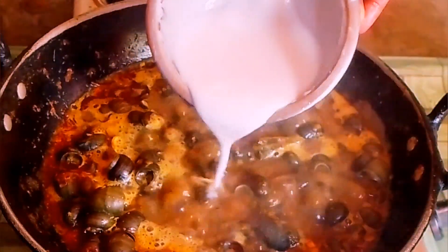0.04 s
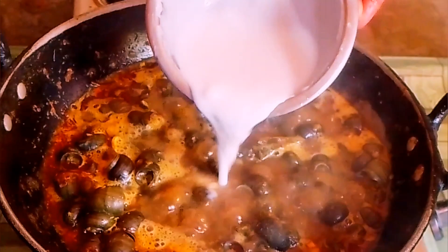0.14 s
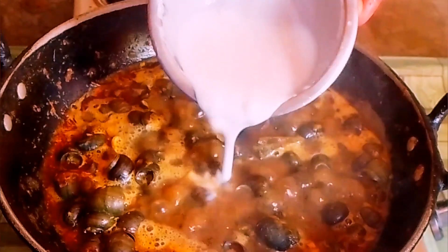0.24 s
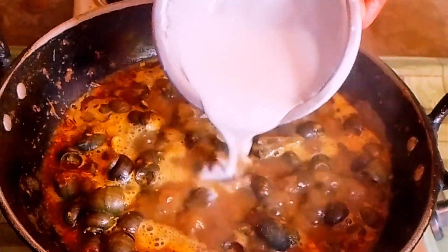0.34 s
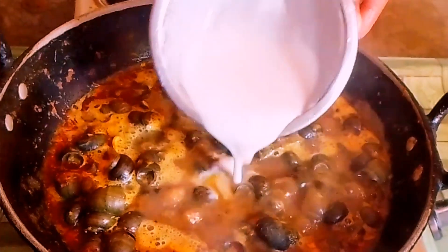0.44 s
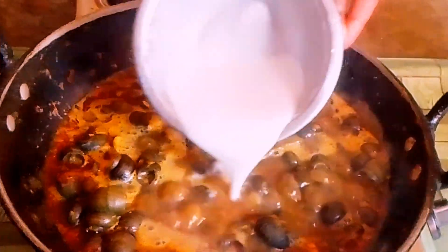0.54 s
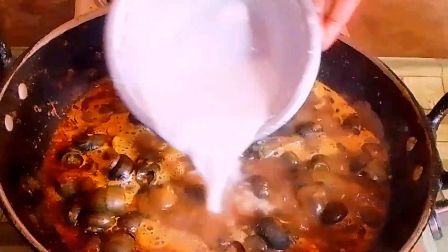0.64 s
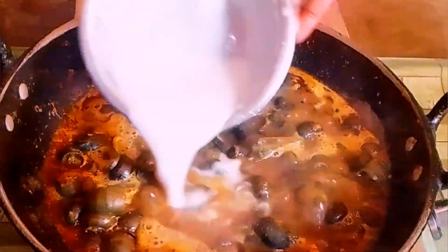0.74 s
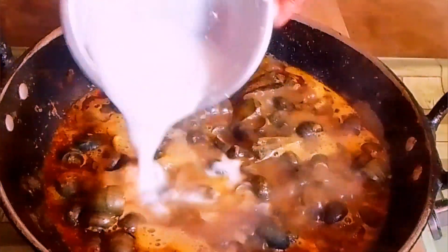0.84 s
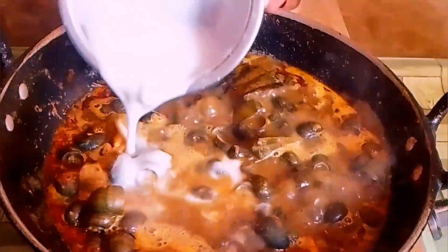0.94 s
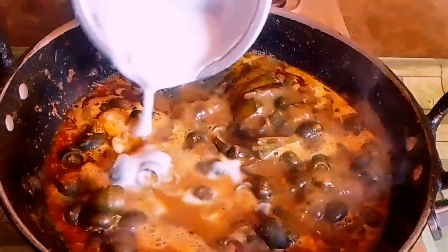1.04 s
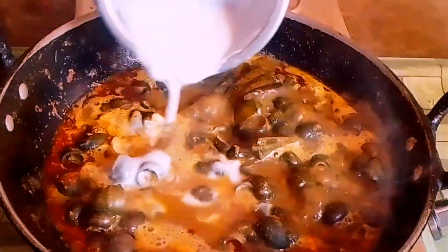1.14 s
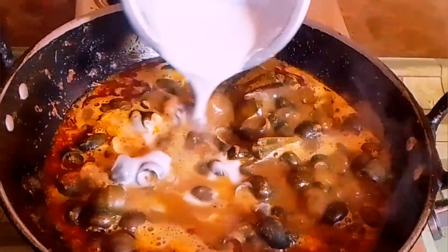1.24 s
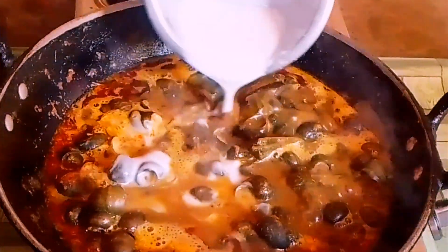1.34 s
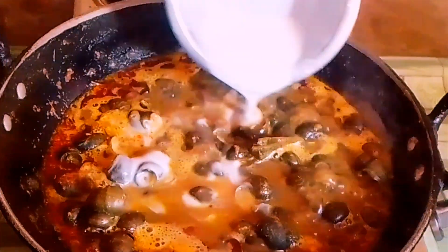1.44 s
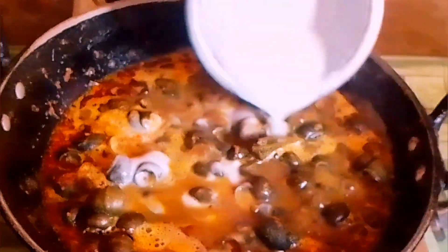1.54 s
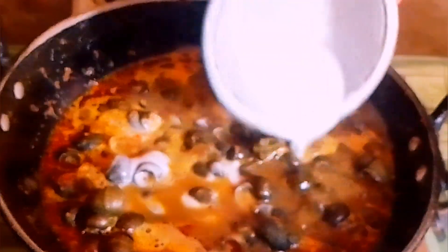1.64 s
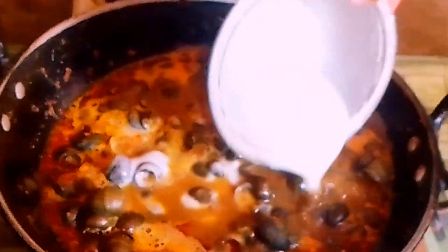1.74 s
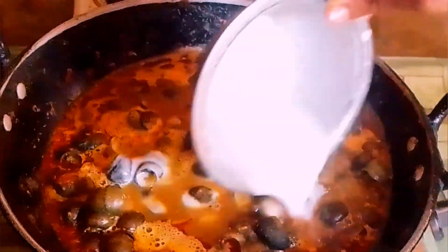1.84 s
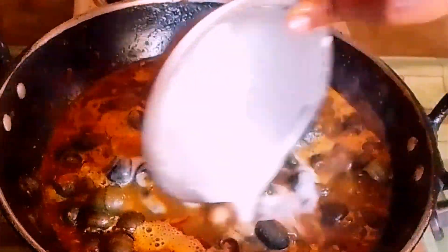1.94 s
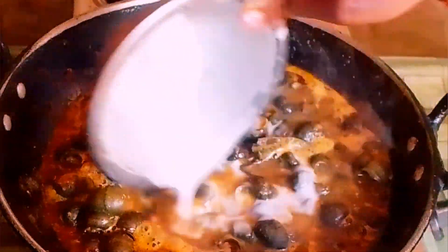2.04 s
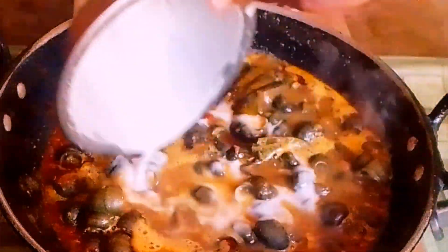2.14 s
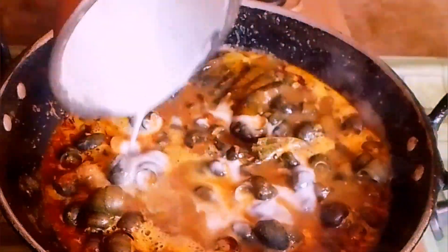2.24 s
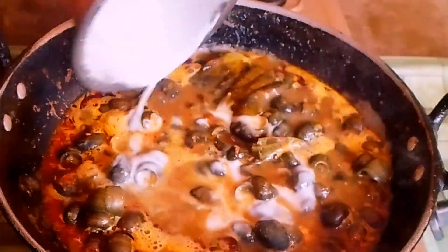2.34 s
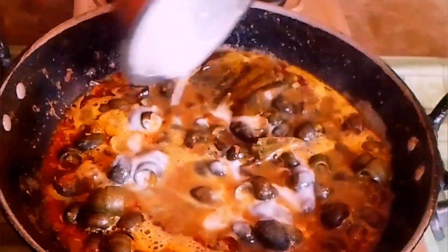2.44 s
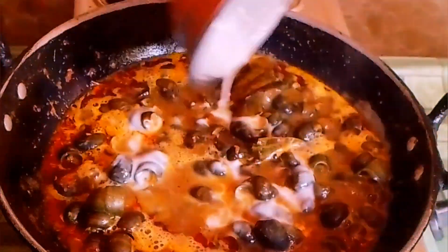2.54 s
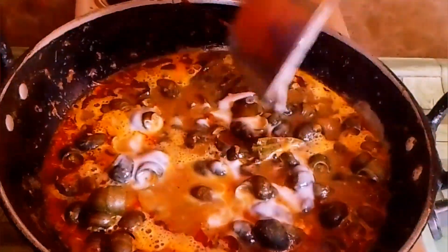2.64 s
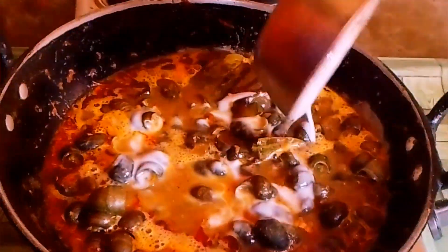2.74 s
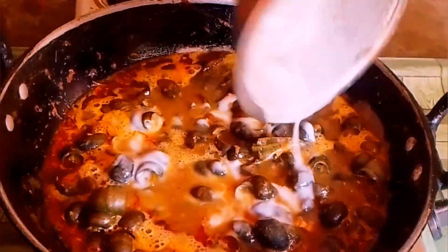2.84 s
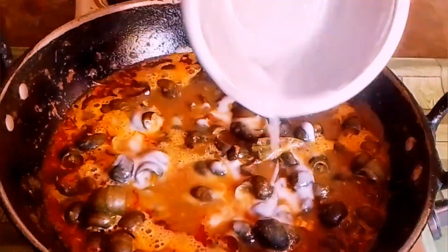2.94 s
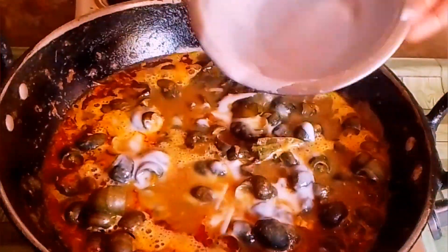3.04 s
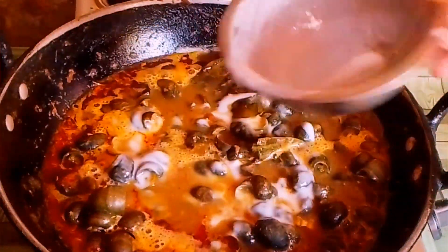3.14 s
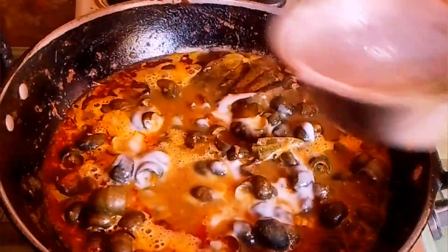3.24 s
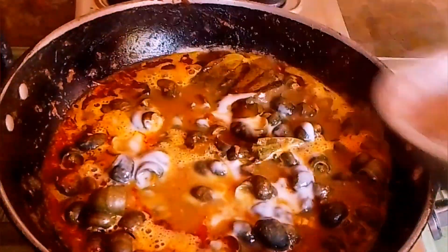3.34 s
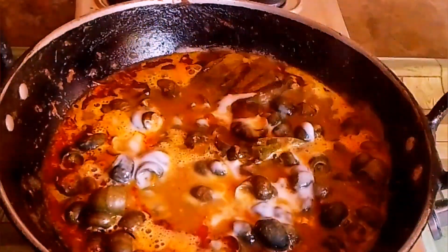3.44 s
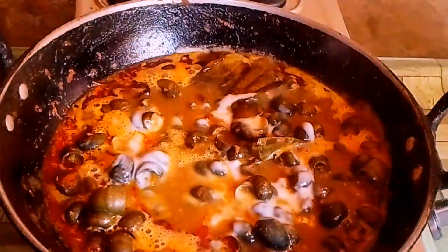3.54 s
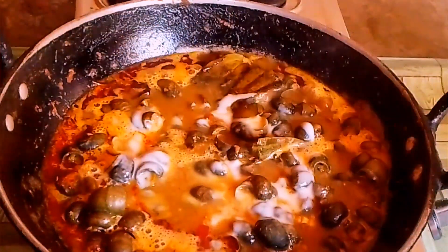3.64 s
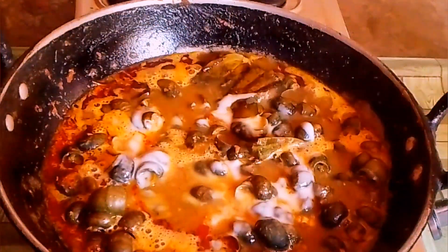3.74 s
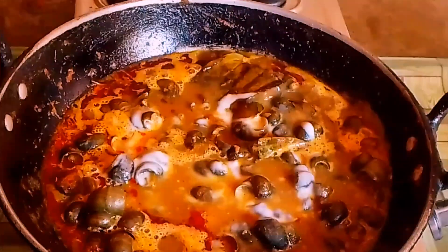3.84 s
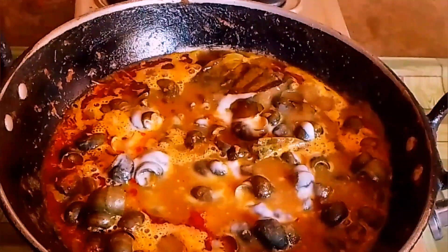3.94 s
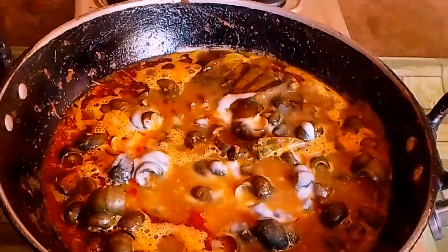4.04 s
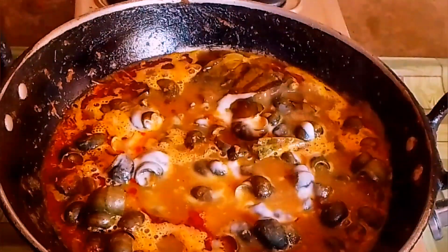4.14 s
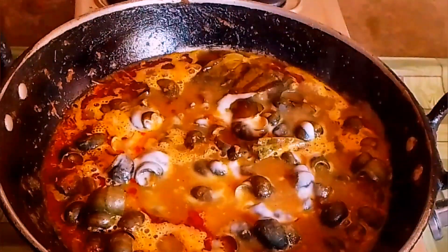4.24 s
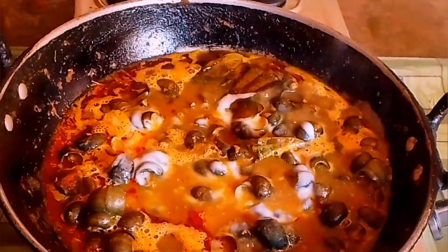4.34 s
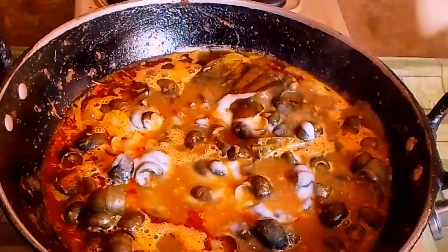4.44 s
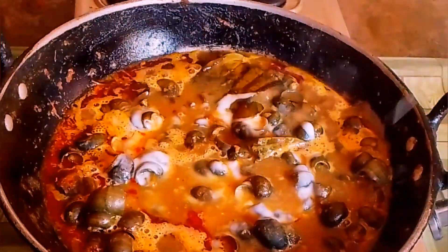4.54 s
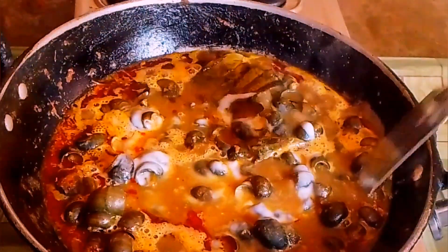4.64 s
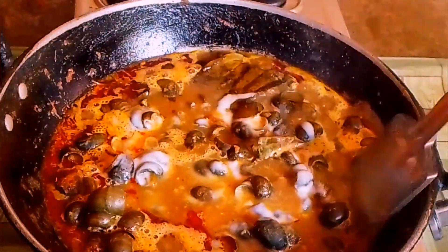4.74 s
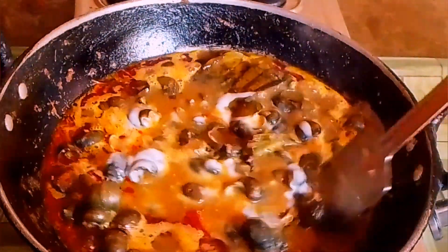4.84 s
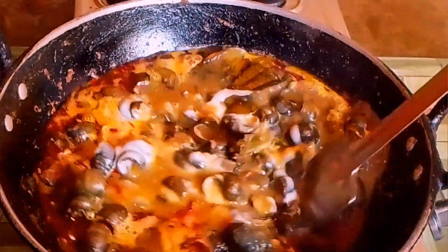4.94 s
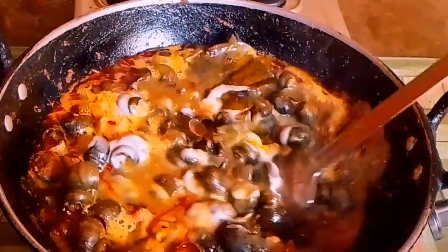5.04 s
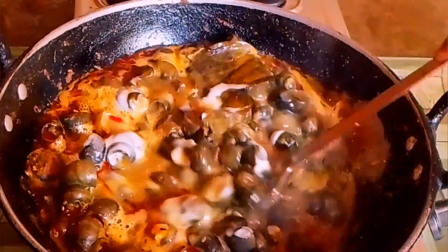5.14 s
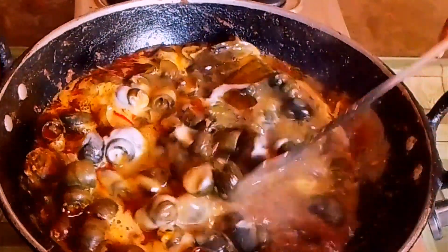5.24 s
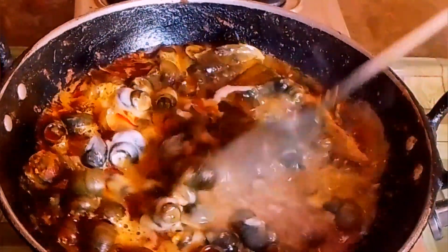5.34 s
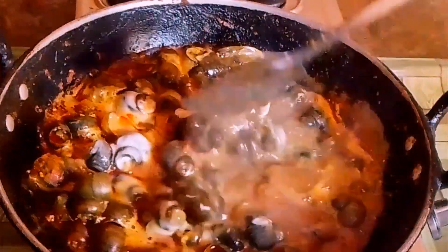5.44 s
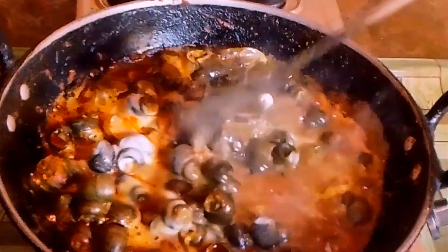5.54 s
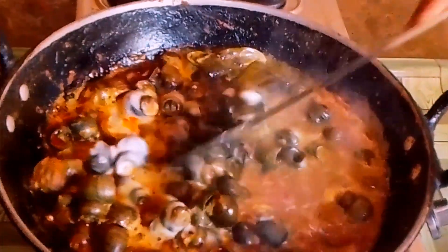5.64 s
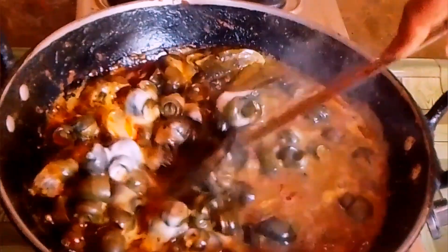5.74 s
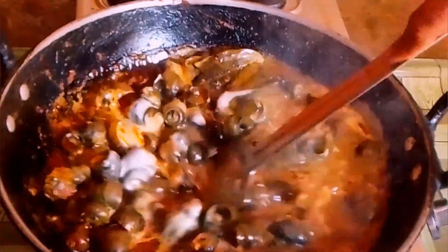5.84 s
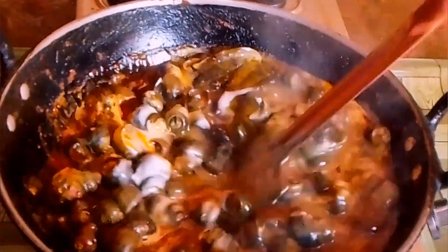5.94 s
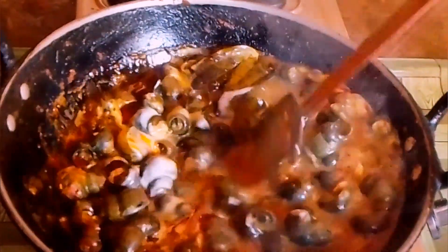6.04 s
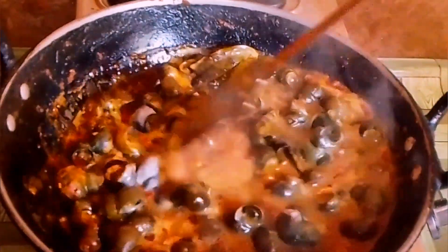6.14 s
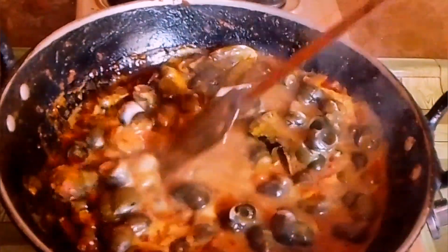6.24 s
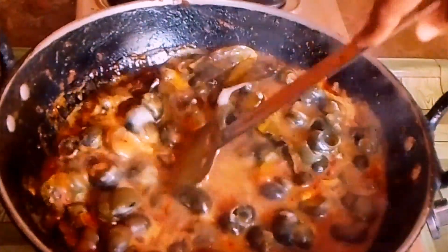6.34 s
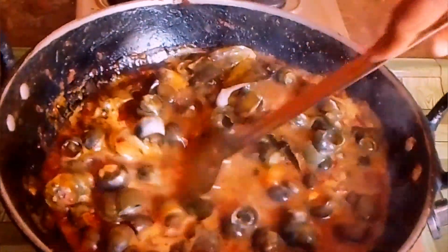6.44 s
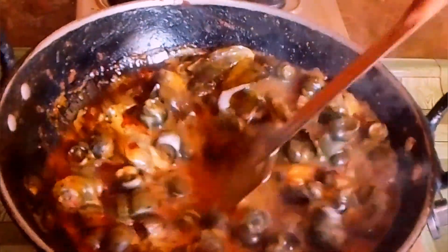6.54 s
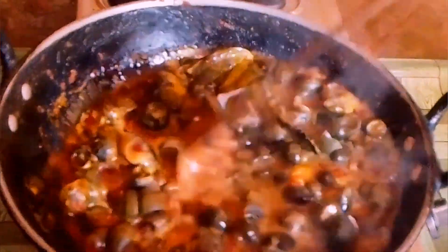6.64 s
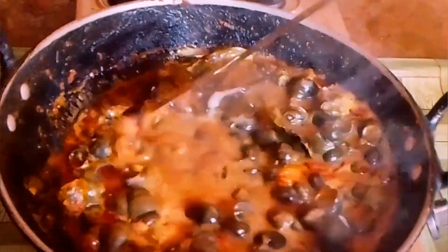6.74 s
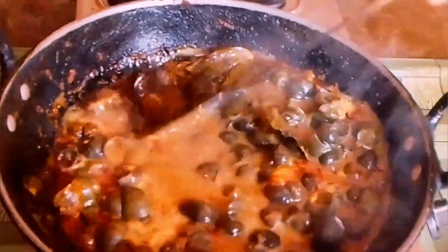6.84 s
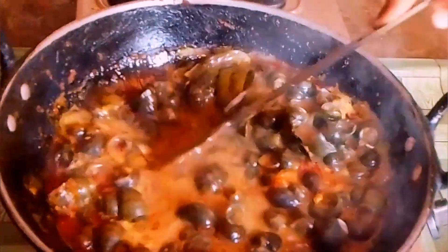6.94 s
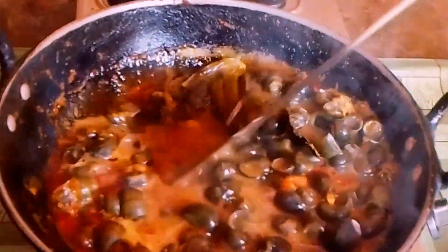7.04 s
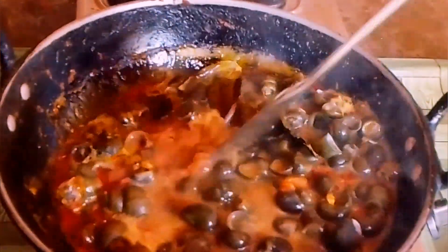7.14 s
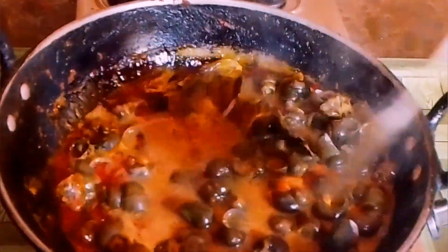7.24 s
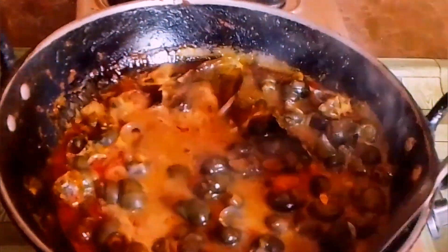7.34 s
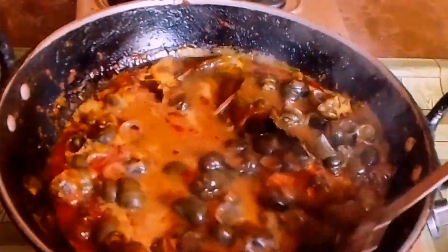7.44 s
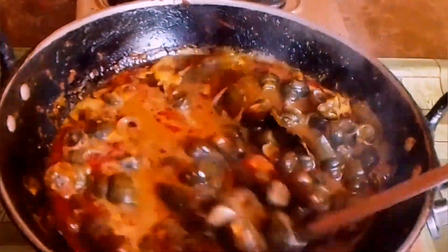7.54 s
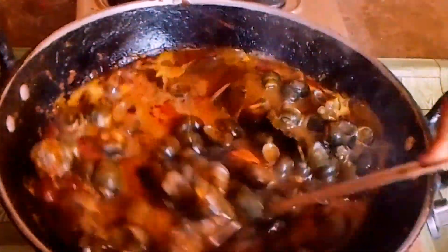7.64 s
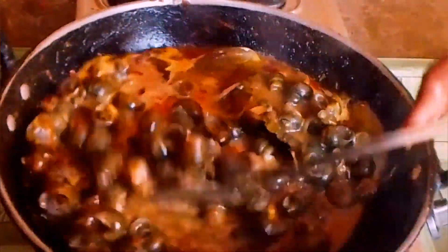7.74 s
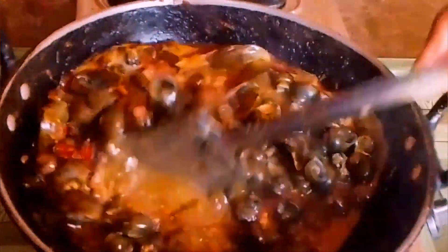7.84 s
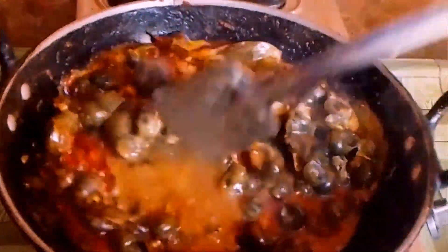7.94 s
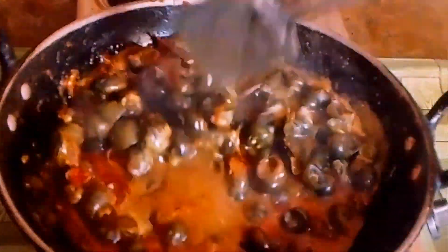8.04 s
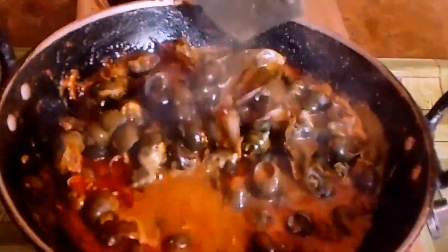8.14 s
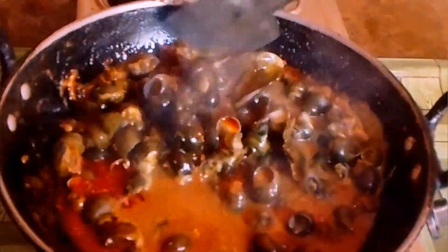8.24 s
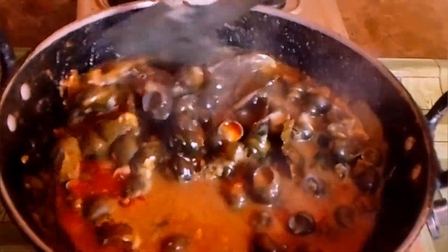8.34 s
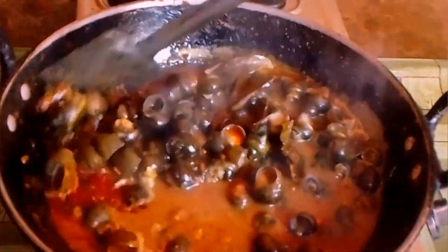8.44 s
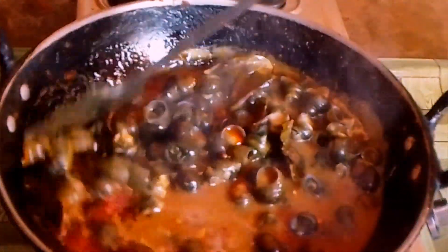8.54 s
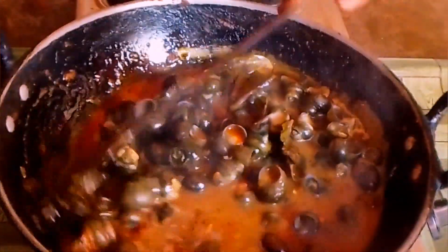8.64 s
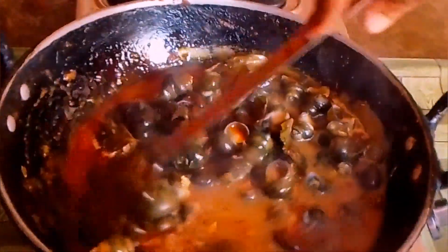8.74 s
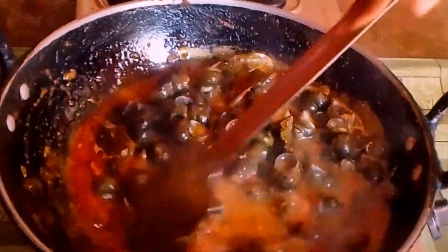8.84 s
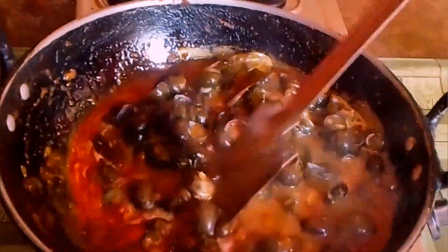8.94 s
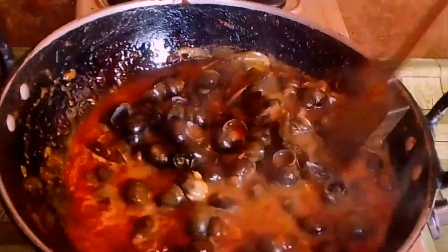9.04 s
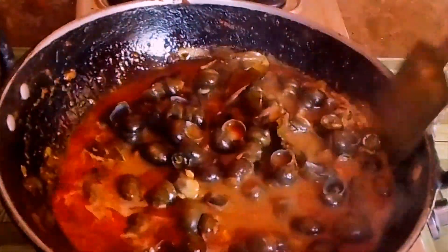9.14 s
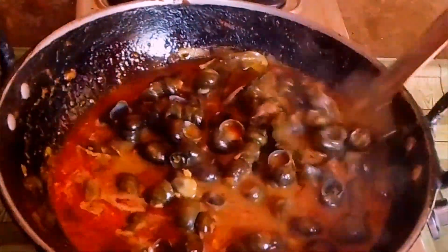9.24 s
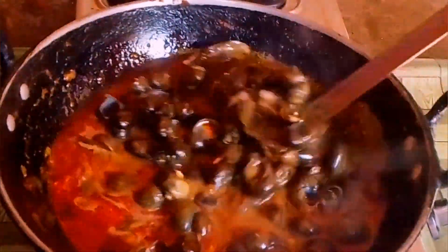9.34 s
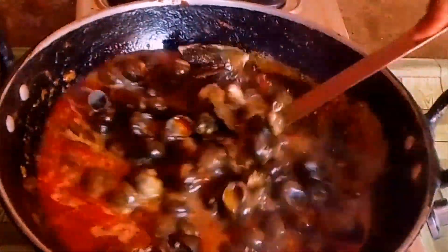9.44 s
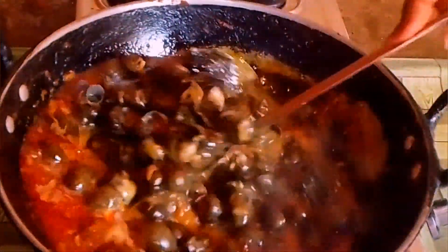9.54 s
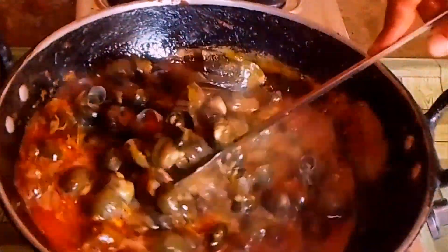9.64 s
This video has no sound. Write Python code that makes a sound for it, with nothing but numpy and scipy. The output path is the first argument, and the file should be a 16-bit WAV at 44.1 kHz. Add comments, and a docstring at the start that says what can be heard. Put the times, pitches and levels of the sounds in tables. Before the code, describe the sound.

Close above a pan in a small kitchen, thick sauce simmers quietly with plopping bubbles, fine fizz and thin steam whistles, then calms. An emptied bowl faintly tinks and rubs along the counter. Suddenly a steel spatula knocks the pan, much louder, and repeated strokes shove snail shells that snap, rattle and scrape in sloshing sauce over a soft burner rush.

```python
"""Snails simmer in a thick curry, heard from just above the pan: decaying rings make bubbles plop and foam fizz,
gliding noise bands make steam sing thinly, and a low hum lies under a steady rush of noise.
Coconut milk calms the boil; then the emptied bowl tinks down and slides aside as resonant friction noise.
Last, a wooden-handled steel spatula knocks into the pan as noise bursts and damped modes, and shoves the shells,
which snap, rattle and scrape through sloshing sauce."""
import sys
import numpy as np
from scipy import signal
from scipy.fft import rfft, irfft, next_fast_len
from scipy.io import wavfile
from scipy.ndimage import map_coordinates

SR = 44100
rng = np.random.default_rng(int(sys.argv[2]) if len(sys.argv) > 2 else 0)


def wav_record(signal):
    """Record a signal, one row per channel, as 16-bit PCM in the file named by sys.argv[1]."""
    frames = np.transpose(np.atleast_2d(signal))
    bounded = np.clip(frames, -1, 1)
    # unit amplitude maps onto the largest positive 16-bit level
    quanta = np.round(bounded * 32767).astype(np.int16)
    wavfile.write(sys.argv[1], SR, quanta)


N = 426888
TIME = np.arange(N) / SR  # seconds through the scene
AGE = np.arange(SR // 3) / SR  # seconds since a hit

# Spatula meeting the pan and rebounding once: (time [s], level [dB], main tone [Hz], second tone [Hz],
# tone level [dB], main tone t60 [s], blade ring [dB], pan thud [dB], rebound delay [s], rebound level [dB])
KNOCKS = [(4.6986, -8, 6760, 3380, -7.5, 0.041, -15, -28, 0.0084, -1),
          (5.3744, -15, 2700, 5200, -8, 0.07, -13, -34, .004, -10),
          (5.457, -22, 5160, 3520, -7, 0.2, -10, -30, .0233, -16),
          (5.522, -10.5, 5160, 7370, -5, 0.07, -5, -28, 0.0068, -9),
          (5.569, -10.5, 1600, 3260, -7.5, 0.025, -13, -23, 0.0051, 3.5),
          (5.5925, -7.5, 1620, 3390, 2, 0.036, -18, -22, .0035, 1.5),
          (6.1758, -12.5, 1450, 3520, -3.5, 0.019, -18, -17, 0.02, -1.5),
          (6.731, -3.5, 1560, 5070, -10, 0.058, -12, -16.5, .0225, -13),
          (7.2779, -8, 2745, 1372, -8.5, 0.054, -8.5, -41, .012, 3.5),
          (7.994, -17, 5200, 7530, -8, .13, -2, -36, .004, -14),
          (8.171, -7, 2750, 5420, -9, 0.11, -3.5, -23, 0.0077, -4),
          (8.8429, -13, 3200, 2780, -10, .06, -10, -36, 0.0056, 2),
          (8.868, -16, 3500, 2760, -12, 0.65, -14, -40, 0.004, -12),
          (9.0934, -8.5, 1697, 2570, -8.5, 0.028, -6, -20, 0.007, 0)]
# Modes of the steel blade: (frequency [Hz], level [dB], t60 [s])
BLADE_MODES = [(1460, 4, 0.16), (1540, -5, 0.17), (1683, -6, 0.6), (2130, -0.5, 0.37), (2370, -14, 0.19),
               (2780, 12.5, 0.076), (3220, 6, 0.28), (3300, -13, 0.31), (4030, 0, 0.19), (4610, -8, 0.12),
               (5260, 6, 0.072), (5340, -22, 0.076), (5780, -3, 0.077), (6400, 6, 0.11), (7640, -12, 0.27),
               (7640, 3, 0.21)]
# Resonances of the pan: (frequency [Hz], width [Hz], level [dB])
PAN_MODES = [(624.2, 6.5, 9.5), (523.7, 9, -2), (892, 12, -3.5), (1075, 11, -0.5), (1376, 115, -2),
             (1557, 71, -2.5), (1997, 48, -2.5), (2670, 55, -4), (3185, 15, -6), (6300, 200, -3.5)]
# Spectra of the clank and of the pan's thud: (frequency [Hz], gain [dB])
CLANK_SPECTRUM = [(80, -71), (170, -40), (260, -7), (800, 2.5), (1500, 3.5), (3300, 13), (5000, 3.5),
                  (7500, -11.5), (10500, -15.5), (13000, -12), (15500, -23)]
THUD_SPECTRUM = [(60, -18), (110, 9), (160, -20), (240, 6), (400, -3), (1000, -54)]
THUD_DB, THUD_S = -9.5, 0.28  # gain and t60
SHIMMER_HZ, SHIMMER_S, SHIMMER_DB = (3700, 10500), 0.13, -13  # upper blade modes: range, t60, level

# Hardest snaps of shells on each other and the blade:
# (time [s], level [dB], low ring [Hz], high ring [Hz], high over low [dB])
CLACKS = [(4.7371, -12, 2150, 3500, -1), (4.9042, -18, 2040, 5090, -11), (4.9303, -19.5, 2590, 3700, -21),
          (4.9998, -13, 1500, 3070, 2), (4.9746, -24, 2500, 4800, -5), (5.18, -22.5, 2420, 3380, -17),
          (5.3375, -9.5, 1370, 3100, 9.5), (5.4274, -16.5, 2360, 4370, 0), (5.4464, -15, 1900, 3020, -6),
          (5.4966, -17, 2430, 3860, 1), (5.5492, -9, 1400, 3470, 12), (5.6096, -9, 2070, 3230, -14),
          (5.6285, -8.5, 1540, 3200, -2), (5.6621, -5, 1920, 2800, 0), (5.6765, -13.0, 1730, 2910, -11),
          (5.6908, -10.5, 1890, 3200, 14), (5.7058, -10, 2550, 3270, 16), (5.7152, -3.5, 1330, 3190, 25),
          (5.7323, -16, 2350, 3240, 11), (5.9998, -14.0, 2450, 3160, 3), (6.098, -12, 2890, 4340, 10),
          (6.188, -11, 1550, 3840, -5), (6.1954, -10, 1470, 3600, -6), (6.2169, -12, 2260, 3500, -4),
          (6.2426, -7, 2070, 3640, -5), (6.5823, -16, 2000, 3150, -2), (6.6933, -10.5, 3300, 4900, -3),
          (6.7545, -14, 1470, 3540, -9), (6.7749, -16, 2080, 3460, -5), (6.7993, -19, 1680, 2750, -12),
          (6.8237, -13.5, 1500, 3100, 0), (6.8482, -8.5, 1900, 4010, -0.5), (6.8542, -19, 1620, 3500, 6),
          (7.3004, -12, 2540, 3250, -16), (7.3356, -16, 2570, 3710, -17), (7.4017, -13.5, 2600, 4470, 6),
          (7.4901, -11.5, 1560, 3780, -3), (7.498, -13, 1420, 3700, -3), (7.541, -13, 1260, 3020, -10),
          (7.5751, -14.5, 2620, 3910, 17), (7.5805, -16.5, 2620, 3200, 4), (7.6904, -14, 2030, 3760, -1),
          (7.7654, -15, 1470, 3260, 3), (7.788, -12.5, 2590, 3380, 4), (7.8175, -17.0, 2190, 3040, 8),
          (7.894, -21, 2000, 3300, 11), (7.9164, -13.5, 1530, 3200, 3), (7.9264, -21, 1560, 3790, 14),
          (8.0125, -17.5, 1400, 3250, 11), (8.1292, -14.5, 1580, 2720, 1), (8.1494, -15, 1940, 3970, 5),
          (8.2136, -8, 1550, 3450, 4), (8.2383, -12, 1640, 3350, -2), (8.3464, -13.5, 1350, 3360, 9),
          (8.4048, -9.5, 2190, 3570, 1), (8.5165, -23, 1990, 4700, 15), (8.758, -14, 2570, 4300, -6),
          (9.1486, -17, 2210, 3240, 7), (9.1654, -15.5, 2590, 3350, 9), (9.211, -10, 2600, 3480, 7),
          (9.2346, -9, 1630, 3100, -17), (9.2481, -9, 1550, 3200, -14), (9.2621, -15.5, 1580, 4080, 2),
          (9.2802, -12.5, 985, 4450, -22), (9.3294, -20, 1120, 3220, 6), (9.4049, -14.5, 2250, 3140, 9),
          (9.4156, -11.5, 1020, 3110, 2), (9.4893, -13.5, 2570, 3400, 6), (9.5228, -12.5, 2700, 3260, 3),
          (9.5814, -20.5, 2640, 3620, -4), (9.6435, -18, 2070, 3990, 8)]
# Spectrum of a snap: (frequency [Hz], gain [dB])
SNAP_SPECTRUM = [(150, 10), (400, -14), (1200, 9), (3200, 11.5), (4800, 8.5), (7000, -1), (11000, -13.5),
                 (15500, -21)]
CLACK_DB = 0.5  # gain of all snaps
CLACK_RING_S, CLACK_WIDTH_HZ = 0.017, 1050  # shortest ring t60; width of the bands a snap excites
# rate; peak over the rattle; middle low ring
LESSER_CLACKS_PER_S, LESSER_CLACK_DB, LESSER_CLACK_HZ = 44, 7, 1900

# Strokes of the spatula: (start [s], end [s], shell rattle [dB], sauce slosh [dB], wet hiss [dB])
STROKES = [(4.70, 5.24, -35.5, -47.5, -41), (5.29, 5.37, -33.5, -49.5, -40), (5.52, 5.71, -28, -40, -37),
           (5.73, 5.88, -37, -56, -45.5), (5.96, 6.05, -35, -51, -49), (6.18, 6.29, -27.5, -37.5, -36),
           (6.38, 6.66, -35.5, -47, -49), (6.73, 6.86, -30.5, -38.5, -44), (6.88, 7.04, -35.5, -46.5, -51),
           (7.28, 7.68, -29, -41.5, -36), (7.72, 7.9, -32.5, -46, -46), (7.92, 8.05, -31.5, -45, -46),
           (8.17, 8.44, -28, -40, -38), (8.46, 8.83, -32.5, -44.5, -44.5), (9.09, 9.18, -30, -40, -30),
           (9.2, 9.34, -29, -37.5, -41), (9.39, 9.55, -31, -44, -43)]
# Bite, easing and dying away of each stroke: (attack [s], easing [dB/s], release t60 [s])
RATTLE_SHAPE = (0.017, 9.3, 0.49)
SLOSH_SHAPE = (0.025, 7.6, 0.78)
HISS_SHAPE = (0.016, 31, .3)
# Spectra of shells, sauce and wet hiss: (frequency [Hz], gain [dB])
RATTLE_SPECTRUM = [(410, -38.5), (700, -16.5), (1050, 2), (1600, -3.5), (1820, -3), (3240, 1.5), (4430, 2),
                   (6830, -28.5), (12600, -38), (16000, -43)]
SLOSH_SPECTRUM = [(100, -29), (180, -36), (260, -2.5), (330, 1.5), (400, 0), (600, 5.5), (900, 6.5),
                  (1400, -16), (2500, 1)]
HISS_SPECTRUM = [(3000, 2), (5000, 10), (6500, 3.5), (9000, -2), (11000, -6.5), (13000, -19), (15500, -2)]
SETTLE_RATTLE_DB, SETTLE_SLOSH_DB = -49, -53.5  # once stirred, shells and sauce keep shifting

# Shells rubbing along pan and blade: (start [s], end [s], start pitch [Hz], end pitch [Hz], level [dB])
SCRAPES = [(4.89, 4.96, 2550, 2740, -40), (5.09, 5.135, 1920, 2080, -41), (5.21, 5.27, 2930, 3170, -34),
           (5.27, 5.34, 3270, 3770, -37.5), (5.585, 5.695, 1554, 1966, -27.5),
           (6.635, 6.68, 2210, 1820, -38.5), (6.94, 7.09, 2760, 2467, -38), (7.41, 7.47, 1972, 1688, -30),
           (7.71, 7.85, 2940, 3340, -35), (8.02, 8.1, 2940, 2220, -36.5), (8.63, 8.78, 2040, 2210, -35.5),
           (9.195, 9.225, 2630, 2035, -22.5), (9.21, 9.265, 1738, 1513, -24.5),
           (9.265, 9.36, 1051, 858, -34.5), (9.47, 9.535, 2810, 3420, -27.5)]
# Soft skids of the blade's edge on the pan wall: (time [s], level [dB], t60 before a further linear fade [s])
SKIDS = [(7.118, -31.5, 0.54), (9.0188, -33, 3.4)]
# Resonances of a skid: (frequency [Hz], width [Hz], level [dB])
SKID_MODES = [(530, 140, -2.5), (1380, 320, 2.5), (2190, 610, 0), (2440, 150, 5.5), (2990, 390, -1)]

# Course of the simmer: bubbling dies down unevenly; fizz sinks, then swells again before the stirring:
# (time [s], bubbling [dB], fizz [dB])
BOIL = [(0, -46, -57.5), (.55, -52, -62), (1.1, -51.5, -62), (1.7, -59, -65), (2.75, -67, -74.5),
        (3.15, -57.5, -70), (3.5, -63, -66), (4.45, -62, -65), (4.7, -67, -56.5)]
# Spectra of bubbling and of foam: (frequency [Hz], gain [dB])
SIMMER_SPECTRUM = [(110, -81), (180, -39), (294, 16), (376, -2), (557, 0), (1090, -1.5), (1260, -5.5),
                   (1640, 1.5), (1930, -2.5), (3260, -3), (9000, -36), (11700, -86), (19800, -120)]
FIZZ_SPECTRUM = [(1200, -8.5), (3000, 0), (5000, -13), (7000, -15.5), (10000, -17.5), (13000, -38),
                 (15500, -13)]
# Biggest bubbles bursting: (time [s], level [dB], middle pitch [Hz])
PLOPS = [(0.023, -36, 1400), (.044, -36, 1640), (0.068, -31.5, 1120), (0.156, -35, 1140),
         (0.219, -32, 1730), (0.253, -35, 1630), (0.308, -31, 800), (0.321, -39, 1260), (0.375, -32, 816),
         (.385, -32, 1310), (0.397, -27.5, 1100), (0.423, -30, 930), (0.474, -30.5, 780),
         (0.557, -32, 1140), (0.588, -31.5, 670), (0.617, -31, 1660), (0.693, -36, 1400),
         (0.722, -33, 1720), (0.804, -31, 2180), (0.945, -25.5, 1490), (0.967, -33, 1690),
         (1.044, -31, 990), (1.051, -23.5, 1020), (1.091, -29, 1120), (1.107, -29.5, 1680),
         (1.12, -35, 2540), (1.197, -28.5, 1300), (1.284, -33, 1080), (1.317, -34, 2460),
         (1.377, -29.5, 655), (1.64, -30.5, 1644), (1.849, -35.5, 820), (1.921, -35, 870),
         (2.069, -37.5, 840), (2.1, -34.5, 1670), (2.236, -37.5, 1330), (2.864, -35.5, 1060),
         (2.888, -37, 2080), (2.962, -36, 1130), (3.042, -39, 1130), (3.09, -36, 1130), (3.181, -28, 1020),
         (3.538, -34, 2140), (3.657, -33, 2080)]
# Spectrum of a tearing bubble skin: (frequency [Hz], gain [dB])
POP_SPECTRUM = [(120, 3), (300, -12.5), (700, 5), (1600, 4), (2600, -3), (4500, -18.5), (10000, -41)]
# rate; peak over the bubbling; middle pitch
LESSER_PLOPS_PER_S, LESSER_PLOP_DB, LESSER_PLOP_HZ = 30, 13, 1250
# Small bright clicks: crackles of the simmer, and the last three from the sliding bowl:
# (time [s], level [dB], pitch [Hz])
TICKS = [(.0323, -41.5, 4570), (.4224, -47, 4870), (.447, -35.5, 2950), (.4808, -45, 4630),
         (.7652, -40, 4700), (.9951, -47, 5200), (1.0929, -52, 5990), (1.335, -39.5, 2750),
         (2.0901, -47, 4370), (3.205, -50, 4800), (3.475, -52, 8740), (3.5558, -57, 4530),
         (4.215, -48, 4380), (4.32, -40, 2980), (4.513, -43, 3150)]
# rate; peak over the fizz; middle pitch
LESSER_TICKS_PER_S, LESSER_TICK_DB, LESSER_TICK_HZ = 24, 9, 4000
# Steam escaping between shells: (start [s], end [s], start pitch [Hz], end pitch [Hz], level [dB])
STEAM = [(.074, .3, 3130, 3390, -55.5), (.405, .6, 3720, 4140, -59), (.75, .91, 3930, 3190, -53),
         (.86, 1.07, 2730, 3110, -51), (1.462, 1.68, 3800, 5330, -64)]
STEAM_WIDTH_HZ, SCRAPE_WIDTH_HZ = 770, 500  # full widths of the gliding bands

# Pushes on the sliding bowl: (start [s], end [s], rub [dB], squeak [dB])
SLIDES = [(3.688, 3.9, -47, -53), (3.94, 3.98, -53, -45.5), (4.02, 4.28, -50, -51.5),
          (4.31, 4.44, -52, -52), (4.6, 4.7, -50.5, -54)]
# Resonances of the bowl and of its squeak: (frequency [Hz], width [Hz], level [dB])
BOWL_MODES = [(530, 210, -1), (1312, 36, 12), (1230, 1200, -2), (2280, 300, -21)]
SQUEAK_MODES = [(2180, 210, 13), (2470, 310, -14), (3340, 990, -23)]
# Course of each push, the squeak letting go sooner: (attack [s], easing [dB/s], release t60 [s])
RUB_SHAPE = (0.0077, 8.7, 0.65)
GRIP_SHAPE = (0.0052, 14, 0.21)
BOWL_WAVER_S = 0.00045  # scale of the time shift that wavers its pitch as the foot rolls

# Spectrum of the burner and room: (frequency [Hz], gain [dB])
KITCHEN_SPECTRUM = [(25, -67), (43, -13), (97, -7), (160, -20.5), (260, 1), (350, -2.5), (503, -7),
                    (624, -4.5), (1100, -6), (1700, -11.5), (3250, -16.5), (9840, -38.5), (12900, -43),
                    (16000, -42)]
KITCHEN_DB = -56
HUM_HZ, HUM_DB = 99, -78.5
# Swells of the hum: (middle [s], half length [s], level [dB])
HUM_SWELLS = [(1.03, 0.39, -64), (2.05, .2, -66), (3.5, .1, -70)]
# Decay of the room: (frequency [Hz], t60 [s])
WALLS = [(200, 1), (2000, 0.5), (6000, 0.13), (14000, 0.1)]
TOP_HZ = 15750  # band limit of the microphone


def knocks():
    """Impact: steel on the laden pan gives a dense, damped clank and a thud; the blade's modes ring on."""
    out = np.zeros(N)
    for s, db, main_hz, second_hz, tone_db, tone_s, ring_db, thud_db, rebound_s, rebound_db in KNOCKS:
        thud = crest(colour(burst(THUD_S), THUD_SPECTRUM))
        add(out, s, amp(db + thud_db + THUD_DB) * thud)
        # the point of contact favours two tones
        tones = amp(tone_db) * (ping(main_hz, tone_s) + 0.6 * ping(second_hz, min(tone_s, 0.2)))
        for delay_s, change_db in [(0, 0), (rebound_s, rebound_db)]:
            clank = crest(colour(burst(0.05) + 0.17 * burst(0.36), CLANK_SPECTRUM))
            # each touch varies the blade's mode levels, pitches and signs
            grip_db = rng.normal(0, 2.2, len(BLADE_MODES))
            modes = [amp(level + grip) * ping(hz * rng.normal(1, 0.011), t60)
                     for (hz, level, t60), grip in zip(BLADE_MODES, grip_db)]
            blade = crest(rng.choice([-1, 1], len(BLADE_MODES)) @ np.array(modes))
            strike = clank + tones + amp(ring_db) * blade + amp(SHIMMER_DB) * shimmer()
            add(out, s + delay_s, amp(db + change_db) * crest(strike))
    return out


def shimmer():
    """Modal density: many upper blade modes, chosen anew at each touch, weaken towards high frequency."""
    hz = rng.uniform(*SHIMMER_HZ, size=48)
    return crest(sum(rng.uniform(-1.16, 1) / f * ping(f, SHIMMER_S) for f in hz))


def clacks():
    """Impact of small stiff bodies: a shell snaps, rings at two pitches and rebounds once, more weakly."""
    out = np.zeros(N)
    lesser = strays(LESSER_CLACKS_PER_S, pushes(STROKES, 0, RATTLE_SHAPE), LESSER_CLACK_DB,
                    LESSER_CLACK_HZ, spread=0.45, scatter_db=3.5)
    shape = rng.random((len(lesser), 2))
    high = lesser[:, 2] * (1.3 + 0.8 * shape[:, 0])
    lesser = np.c_[lesser, high, 16 * (shape[:, 1] - 0.5)]
    for s, db, low_hz, high_hz, tilt_db in [*CLACKS, *lesser]:
        modes = [(low_hz, CLACK_WIDTH_HZ, min(-tilt_db, 0)), (high_hz, CLACK_WIDTH_HZ, min(tilt_db, 0))]
        noise = colour(burst(0.007) + 0.4 * burst(0.028), SNAP_SPECTRUM)
        snap = crest(resonate(noise, modes, direct=0.3))
        # the more the high ring dominates, the longer and stronger the ringing
        purity = amp(max(tilt_db, 0) / 3)
        pings = sum(amp(level) * ping(hz, CLACK_RING_S * purity) for hz, _, level in modes)
        ring = crest(pings * (1 - np.exp(-AGE / 0.00035)))
        shell = amp(db + CLACK_DB) * crest(snap + amp(-3) * np.sqrt(purity) * ring)
        add(out, s, shell)
        add(out, s + rng.uniform(0.003, 0.012), amp(-13) * shell)
    return out


def stirring():
    """Granular contact: shells shoved over the pan floor rattle; sauce sloshes and hisses on bare metal."""
    shoving = pushes(STROKES, 0, RATTLE_SHAPE)
    sloshing = pushes(STROKES, 1, SLOSH_SHAPE)
    hissing = pushes(STROKES, 2, HISS_SHAPE)
    jerks = wobble(45)  # shared by shells and hiss
    shells = grains(rate=800, centre_hz=2800, spread=0.7, cycles=16, scatter_db=2.2, size=500)
    grit = grains(rate=1700, centre_hz=2580, spread=1.11, cycles=2.4, scatter_db=2.7, size=160)
    rattle = unit(colour(shells + grit, RATTLE_SPECTRUM) * amp(1.8 * jerks))
    sauce = grains(rate=1500, centre_hz=646, spread=1.134, cycles=7.1, scatter_db=2, rise=0.12, size=700)
    slosh = unit(colour(sauce, SLOSH_SPECTRUM))
    spit = grains(rate=4500, centre_hz=7800, spread=0.75, cycles=4, scatter_db=2.6, size=80)
    hiss = unit(colour(spit, HISS_SPECTRUM) * amp(1.8 * jerks))
    stirred = TIME > KNOCKS[0][0]
    shoving = np.hypot(shoving, stirred * amp(SETTLE_RATTLE_DB))
    sloshing = np.hypot(sloshing, stirred * amp(SETTLE_SLOSH_DB))
    return rattle * shoving + slosh * sloshing + hiss * hissing


def scrapes():
    """Stick-slip friction: dragged shells jerk, and their pitch moves with the point of contact."""
    slips = grains(rate=260, centre_hz=170, spread=0.5, cycles=1.5, scatter_db=1.2, size=500)
    return glides(SCRAPES, SCRAPE_WIDTH_HZ, flutter_db=1.5) * unit(0.7 + np.abs(slips))


def skids():
    """Sliding friction: resonant noise starts at once and fades as the blade slows."""
    out = np.zeros(N)
    for s, db, t60 in SKIDS:
        dull = colour(rng.standard_normal(len(AGE)), [(3000, 13.0), (4500, -24.0)])
        rub = unit(resonate(dull, SKID_MODES))
        add(out, s, amp(db) * rub * fade(t60) * np.linspace(1, 0, len(AGE)))
    return out


def simmer():
    """Bubble resonance: small bubbles ring in clumps over a wet seethe, and the foam at the rim crackles."""
    bubble_db, fizz_db = curves(BOIL)
    bubbles = grains(rate=460, centre_hz=1345, spread=0.98, cycles=4.9, scatter_db=3.0, rise=0.028, size=600)
    seethe = 0.45 * rng.standard_normal(N)
    bubbles = unit(colour(bubbles + seethe, SIMMER_SPECTRUM) * amp(2.8 * wobble(28)))
    foam = grains(rate=1100, centre_hz=5400, spread=1.0, cycles=5, scatter_db=2.6, size=160)
    foam = unit(colour(foam, FIZZ_SPECTRUM))
    return bubbles * amp(bubble_db) + foam * amp(fizz_db)


def plops():
    """Cavity resonance: a big bubble's skin tears, its hollow rings briefly and a splat falls back."""
    out = np.zeros(N)
    lesser = strays(LESSER_PLOPS_PER_S, amp(curves(BOIL)[0]), LESSER_PLOP_DB,
                    LESSER_PLOP_HZ, spread=0.58, scatter_db=5)
    for s, db, hz in [*PLOPS, *lesser]:
        for delay_s, change_db in [(0, 0), (rng.uniform(0.003, 0.011), -8)]:
            tear = crest(colour(burst(0.018) + 0.12 * burst(0.09), POP_SPECTRUM))
            hollow = ping(hz * rng.normal(1, 0.07), 0.026) * np.minimum(AGE * hz, 1)
            add(out, s + delay_s, amp(db + change_db) * crest(tear + 0.8 * hollow))
    return out


def ticks():
    """Impulsive excitation: each click is a noise burst in a narrow bright band; lesser ones follow the fizz."""
    out = np.zeros(N)
    lesser = strays(LESSER_TICKS_PER_S, amp(curves(BOIL)[1]), LESSER_TICK_DB,
                    LESSER_TICK_HZ, spread=0.4, scatter_db=5)
    for s, db, hz in [*TICKS, *lesser]:
        band = [(hz, 0.35 * hz, 0)]
        click = resonate(resonate(burst(0.02), band), band)
        add(out, s, amp(db) * crest(click))
    return out


def steam():
    """Jet noise: thin hissing whistles glide as their vents open and close."""
    return glides(STEAM, STEAM_WIDTH_HZ, flutter_db=1.5)


def bowl():
    """Friction-driven resonance: the bowl tinks down and rubs along the counter, squeaking where it grips."""
    rubbing = pushes(SLIDES, 0, RUB_SHAPE)
    gripping = pushes(SLIDES, 1, GRIP_SHAPE)
    rub = grains(rate=1500, centre_hz=1380, spread=1.54, cycles=2.6, scatter_db=1.5, size=200)
    # reading the sound at a shifting time makes its pitch waver
    wavering_time = TIME + BOWL_WAVER_S * wobble(20)
    body = map_coordinates(resonate(rub, BOWL_MODES), [SR * wavering_time])
    squeak = unit(resonate(rub, SQUEAK_MODES))
    out = unit(body) * rubbing * amp(1.4 * wobble(24.15)) + squeak * gripping
    add(out, 3.69, amp(-58) * ping(5960, 0.28))  # tink
    return out


def kitchen():
    """Broadband noise and a tone: the steady rush of burner and room, with a wavering, swelling hum."""
    rush = unit(colour(rng.standard_normal(N), KITCHEN_SPECTRUM)) * amp(KITCHEN_DB)
    hum = np.sqrt(2) * np.sin(2 * np.pi * HUM_HZ * TIME + 0.46 * wobble(9.1))
    swells = sum(amp(db) * np.exp(-((TIME - s) / half_s) ** 2) for s, half_s, db in HUM_SWELLS)
    return rush + hum * (amp(HUM_DB) + swells) * amp(0.61 * wobble(5.3))


def walls(x):
    """Reverberation: the small room answers after 5 ms with decaying noise whose treble dies first."""
    hz, t, z = signal.stft(rng.standard_normal(SR // 2), SR, nperseg=256)
    decay = amp(-60 * t / along(WALLS, hz)[:, None])
    tail = signal.istft(z * decay, SR, nperseg=256)[1]
    response = np.r_[np.zeros(SR // 200), tail / np.linalg.norm(tail)]
    return signal.fftconvolve(x, response)[:N]


def glides(rows, width_hz, flutter_db):
    """Modulation: narrow fluttering noise rides on a carrier that slides from one pitch to another."""
    out = np.zeros(N)
    for start, end, from_hz, to_hz, db in rows:
        u = np.linspace(0, 1, max(int((end - start) * SR), 2))
        phase = 2 * np.pi * np.cumsum(from_hz + (to_hz - from_hz) * u) / SR
        a, b = (filtered(rng.standard_normal(len(u)), lambda f: 1 / (1 + (2 * f / width_hz) ** 2))
                for _ in range(2))
        band = unit(a * np.sin(phase) + b * np.cos(phase))
        add(out, start, amp(db) * np.sqrt(np.abs(np.sin(np.pi * u))) * band)
    return out * amp(flutter_db * wobble(120))


def grains(rate, centre_hz, spread, cycles, scatter_db, rise=0, size=400):
    """Superposition: random damped rings, built up over one cycle, sum to rms 1; rise lifts their pitch."""
    draw = rng.random((int(rate * N / SR), 4))
    hz = centre_hz * np.exp(spread * (draw[:, 1:2] + draw[:, 2:3] - 1))
    hz = np.clip(hz, 100, SR / 2.5)
    strength = amp(scatter_db * np.minimum(-np.log(1 - draw[:, 3:]), 4.5))
    turns = hz * np.arange(size) / SR
    life = np.minimum(turns / cycles, 2)
    ring = np.sin(2 * np.pi * turns * (1 + rise * life))
    waves = strength * ring * np.exp(-np.log(100) * life) * np.minimum(turns, 1)
    where = (draw[:, :1] * N).astype(int) + np.arange(size)
    return unit(np.bincount(where.ravel(), waves.ravel(), N)[:N])


def strays(rate, gain, over_db, centre_hz, spread, scatter_db):
    """Random arrivals: (time [s], level [dB], pitch [Hz]) following a gain curve, none where it is zero."""
    when, size, pitch = rng.random((int(rate * N / SR), 3)).T
    level = gain[(when * N).astype(int)]
    db = 20 * np.log10(level + 1e-9) + over_db + scatter_db * (2 * size - 1)
    hz = centre_hz * np.exp(spread * (2 * pitch - 1))
    return np.c_[when * N / SR, db, hz][level > 0]


def pushes(rows, column, shape):
    """Energy summation: gain of pushes that each attack, slowly ease and release."""
    attack_s, easing_db_per_s, release_s = shape
    power = np.zeros(N)
    for start, end, *levels_db in rows:
        first = int(start * SR)
        t = TIME[first:int((end + 1) * SR)]
        easing_db = easing_db_per_s * (np.minimum(t, end) - start)
        release_db = 60 * np.maximum(t - end, 0) / release_s
        attack = np.clip((t - start) / attack_s, 0, 1)
        gain = amp(levels_db[column] - easing_db - release_db) * attack
        power[first:first + len(t)] += gain ** 2
    return np.sqrt(power)


def burst(t60):
    """Impulsive noise: a puff that decays exponentially."""
    return rng.standard_normal(len(AGE)) * fade(t60)


def ping(hz, t60):
    """Damped oscillation: one decaying mode."""
    return np.sin(2 * np.pi * hz * AGE) * fade(t60)


def fade(t60):
    """Exponential decay: gain falls 60 dB in t60 seconds."""
    return amp(-60 * AGE / t60)


def resonate(x, modes, direct=0):
    """Resonance: x drives (frequency [Hz], width [Hz], level [dB]) modes, plus a direct share."""
    def response(f):
        return direct + sum(amp(db) * 1j * f * w / (c * c - f * f + 1j * f * w) for c, w, db in modes)
    return filtered(x, response)


def colour(x, spectrum):
    """Minimum-phase filtering: a causal response with the gain of (frequency [Hz], gain [dB]) points."""
    def response(hz):
        # folding the cepstrum makes the response causal
        cepstrum = irfft(np.log(amp(along(spectrum, hz))))
        half = len(cepstrum) // 2
        return np.exp(rfft(np.r_[cepstrum[0], 2 * cepstrum[1:half], np.zeros(half)]))
    return filtered(x, response)


def filtered(x, response):
    """Linear filtering: multiply the spectrum of x by a response of frequency."""
    m = 2 * next_fast_len(len(x) // 2 + 2048)
    return irfft(rfft(x, m) * response(np.fft.rfftfreq(m, 1 / SR)), m)[:len(x)]


def wobble(rate):
    """Slow random modulation: a smooth curve with rate knots a second."""
    return map_coordinates(rng.standard_normal(int(N * rate / SR) + 4), [TIME * rate])


def curves(rows):
    """Linear interpolation: one value per sample for each column after the time."""
    s, *cols = np.transpose(rows)
    return [np.interp(TIME, s, c) for c in cols]


def along(points, hz):
    """Logarithmic frequency scale: interpolate (frequency [Hz], value) points."""
    f, v = np.transpose(points)
    return np.interp(np.log(hz + 1), np.log(f + 1), v)


def add(track, s, sound):
    """Superposition: mix a sound into a track at time s."""
    part = track[max(round(s * SR), 0):][:len(sound)]
    part += sound[:len(part)]


def amp(db):
    """Logarithmic level: decibels to gain."""
    return 10 ** (np.asarray(db) / 20)


def unit(x):
    """Mean-power normalisation: scale to rms 1."""
    return x / np.sqrt(np.mean(x ** 2) + 1e-20)


def crest(x):
    """Peak normalisation: scale to peak 1."""
    return x / (np.abs(x).max() + 1e-20)


def scene():
    """Resonance and superposition: knocks and stirring excite the pan, and all sources add up."""
    touch = amp(-2.0) * resonate(stirring() + knocks(), PAN_MODES, direct=1)
    near = touch + clacks() + scrapes() + skids()
    near = near + simmer() + plops() + ticks() + steam() + bowl()
    # the microphone's high-pass thins the bass of the near sounds
    near = colour(near, [(60, -26), (140, -16.5), (230, -1.0)])
    return (near + amp(-12.5) * walls(near) + kitchen())[None]


def record(dry):
    """Band limitation: the microphone keeps nothing above its top frequency."""
    return filtered(dry[0], lambda hz: hz < TOP_HZ)[None]


dry = scene()
out = record(dry)
wav_record(out)
```